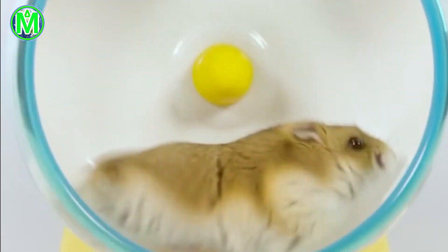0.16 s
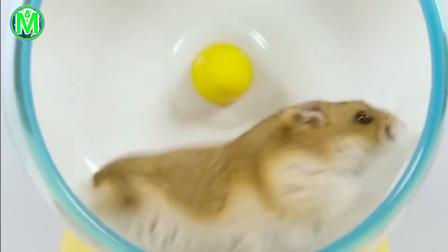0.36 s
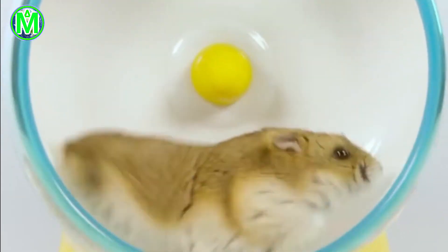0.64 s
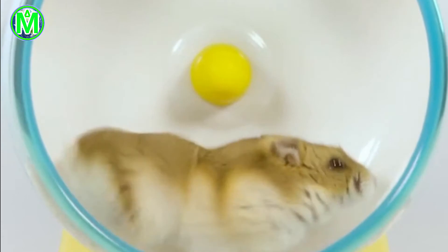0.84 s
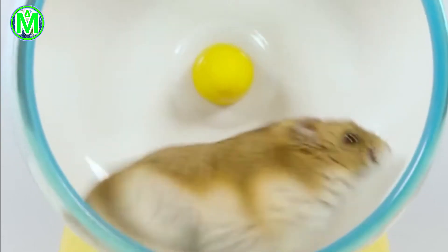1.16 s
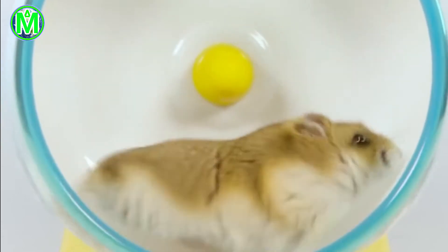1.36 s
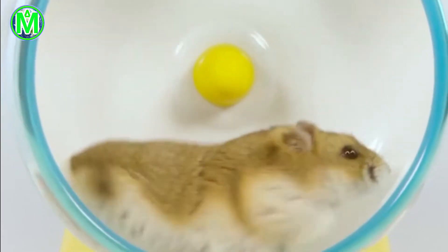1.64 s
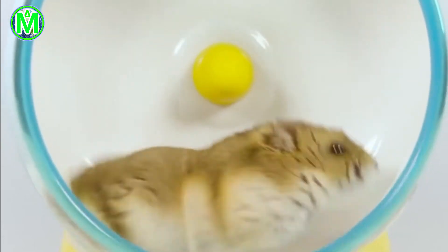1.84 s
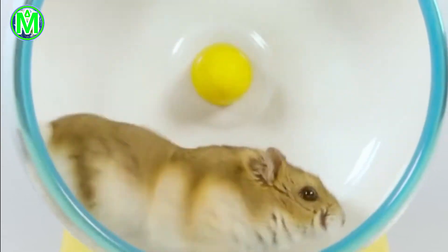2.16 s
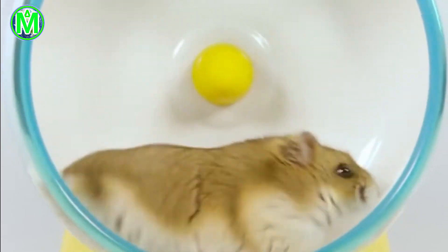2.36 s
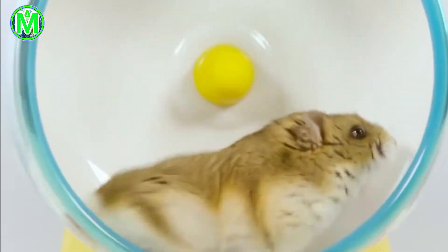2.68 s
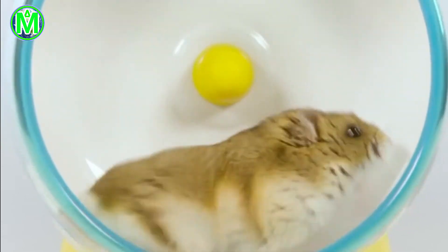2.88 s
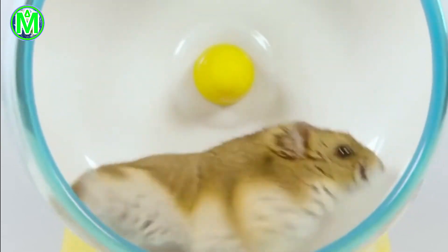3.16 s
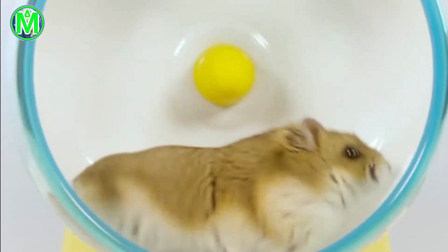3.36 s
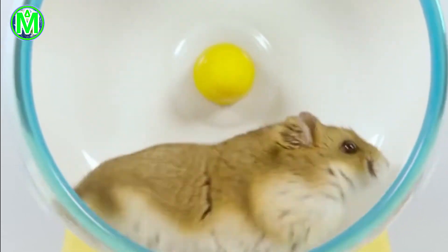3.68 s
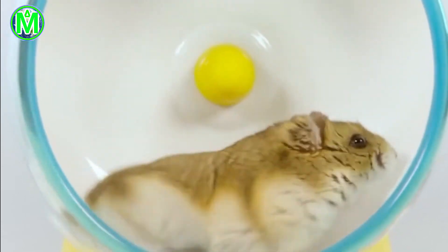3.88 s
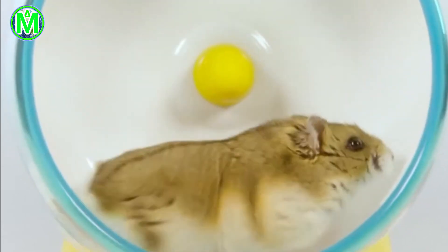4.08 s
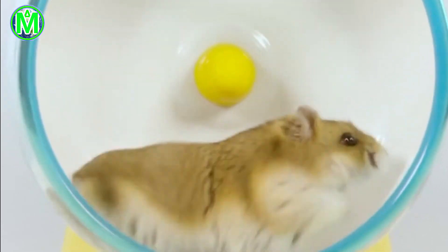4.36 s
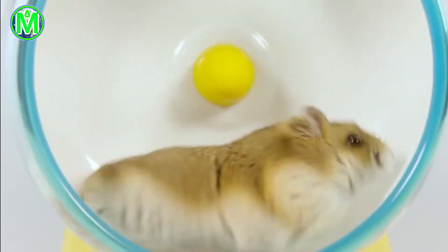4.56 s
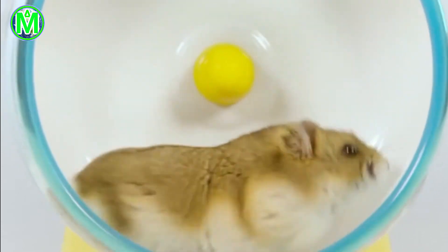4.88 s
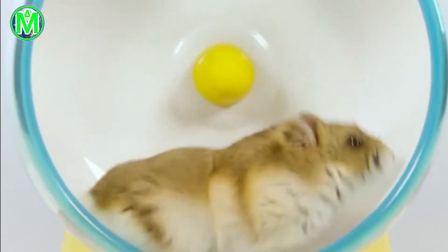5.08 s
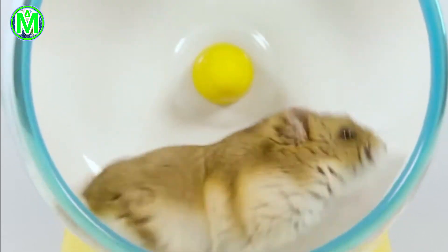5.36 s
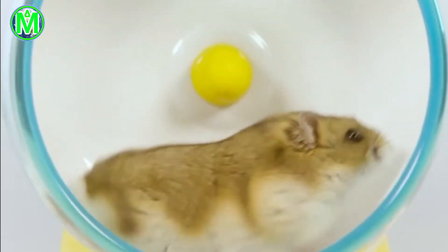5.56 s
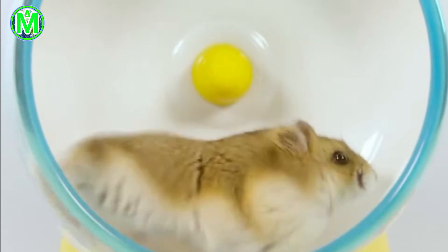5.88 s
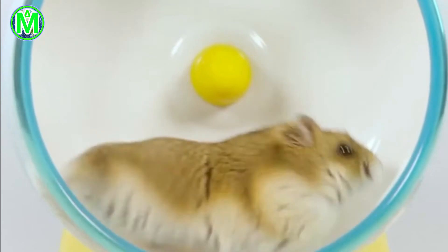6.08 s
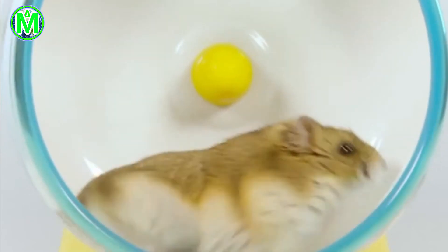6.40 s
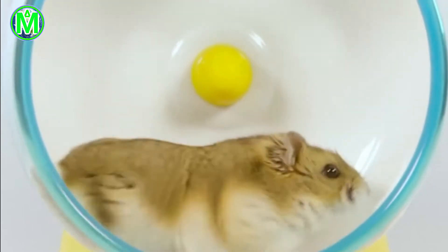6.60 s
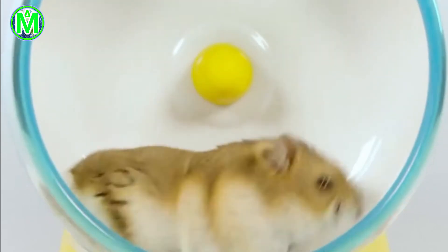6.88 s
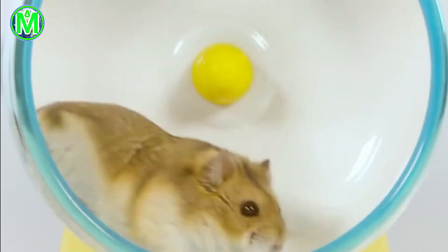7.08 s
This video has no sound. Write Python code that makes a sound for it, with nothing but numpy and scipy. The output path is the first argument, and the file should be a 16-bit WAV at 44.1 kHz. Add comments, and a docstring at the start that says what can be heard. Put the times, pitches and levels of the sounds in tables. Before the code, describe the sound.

A small hamster squeaks close to a stereo microphone in a small, bare, lightly echoing space. A tick and two quick piercing squeaks come at once, a longer wavering one at 0.2 seconds, then single squeaks near 0.4, 0.75 and 1.0. Each is a tiny high whistle, under a tenth of a second, some cracking into a rasp. From about 1 to 2.7 seconds there is only soft airy hiss and thin hum, dipping near 1.9 and swelling back, with barely audible ticks. A faint peep and thinner squeak at 2.8 lead to a crisp paw scuff at 2.9. Rapid squeaks return at 3.15, 3.35 and 3.45, a raspy pair at 3.7, then 3.95, a loud one at 4.2, 4.7, 5.05 and a last one at 5.3. Light scuffs appear among them, with a very faint chirp around 5.5. Quiet hiss continues to about 7 seconds.

```python
"""In a small bare room, a small rodent squeaks in bursts close to a stereo microphone. Each call is a whistle
mostly near 4-5 kHz with overtones; at times its period doubles or it breaks into a rasp of noise and split lines.
Short noise bursts, part ringing, part hissing, make paw scuffs, ticks and one faint narrow chirp near the end.
Behind them lie shaped stereo hiss, a thin hum and one faint far tone; the background drops in the first long
pause and swells back."""
import sys
import numpy as np
from scipy import signal
from scipy.fft import rfft, irfft, next_fast_len
from scipy.io import wavfile
from scipy.ndimage import uniform_filter1d, minimum_filter1d, map_coordinates

SR = 44100
rng = np.random.default_rng(int(sys.argv[2]) if len(sys.argv) > 2 else 0)


def store_wav(level_fs):
    """Save 16-bit WAV to argv[1]."""
    pcm = np.round(np.clip(np.atleast_2d(level_fs), -1, 1) * 32767)
    wavfile.write(sys.argv[1], SR, pcm.T.astype(np.int16))


N = 319284

# Background contour before a common lift: (time [s], level [dB])
AIR_CONTOUR = [(0, -56), (.3, -64), (1.2, -63), (1.94, -68.5), (1.945, -73), (2.8, -62.5), (4.3, -61.5),
               (5.5, -63.5), (7.24, -64)]
# Colour of the background hiss: (frequency [Hz], relative level [dB])
HISS_COLOUR = [(24, -70), (40, -39.5), (156, -39.5), (332, -22.5), (563, -9), (802, -4.5), (865, -2),
               (1060, -3.5), (1140, -4.5), (2490, -8), (14900, -13.5), (16500, -28)]
# Left-right likeness of the hiss: (frequency [Hz], correlation [-1 to 1])
HISS_LIKENESS = [(60, 0.01), (240, 0.06), (950, 0.37), (3770, -0.25), (15000, 0.12)]
HUM_HZ, HUM_DB = 1140, -15  # the hum's mean peak level, relative to the background contour
# Faint far tone: (time [s], pitch [Hz], rms level [dB])
FAR_TONE = [(4.63, 745, -79), (4.69, 748, -55), (4.74, 767, -55), (4.79, 742, -66), (4.83, 734, -68)]
# Paw scuffs, ticks and one faint narrow chirp near the end, levels before the ports:
# (time [s], ring level [dB], ring pitch [Hz], ring width [Hz], hiss level [dB], rise [s], 60 dB decay [s])
SHORT_BURSTS = [(0.022, -31.5, 3280, 509.6, -47, .001, 0.034),
                (1.181, -46, 10840, 2536, -66.5, 0.0053, 0.04), (2.533, -57.5, 2502, 600, -82, 0.0011, .02),
                (2.714, -67, 4970, 1500, -63, .001, .015), (2.8753, -36.5, 2520, 1583, -41, .002, 0.095),
                (2.894, -28, 2440, 1502, -41, 0.0025, .03), (2.899, -26, 3312, 2417, -26.5, .004, 0.033),
                (2.902, -44, 3000, 3027, -49, 0.0052, 0.18), (3.041, -56, 3980, 1500, -78, .001, 0.026),
                (3.627, -50.5, 2590, 1505, -50.5, 0.0022, 0.24),
                (4.157, -41.5, 2740, 1186, -41, 0.004996, 0.076),
                (5.253, -54.5, 4470, 2000, -59.5, .001, .02), (5.38, -56, 2633, 810, -45.5, .008, 0.072),
                (5.515, -66.5, 4196, 150, -83.5, 0.0066, 0.22)]
# Colour shared by raspy voice and burst hiss: (frequency [Hz], level [dB])
RASP_COLOUR = [(700, -56), (1300, -25), (1700, -9), (2300, -8), (3300, -10.5), (4600, -2), (6500, -2.5),
               (8000, -4.5), (11000, 4.5), (13000, -8), (14200, -20), (16000, -22.5)]
# Phase by which the left port leads, for a source one unit aside: (frequency [Hz], lead [rad])
PORT_LEAD = [(2400, 0), (4500, .7), (7000, 1.25), (9500, 1.7), (11700, 4.4), (14000, 8)]
# Whistle contours, one table per squeak: (time [s], pitch [Hz], level [dB])
SQUEAK_CONTOURS = [
    [(0.0555, 4490, -17.5), (0.0584, 4423, -13.5), (0.0609, 4816, -19.5), (0.0627, 4794, -18.0),
     (0.068, 4460, -24), (0.073, 4597, -32.0)],
    [(0.0755, 4491, -16.5), (0.0802, 4396, -11), (0.0822, 4550, -13.0), (0.0839, 4730, -19),
     (0.0862, 4744, -21.0), (0.0996, 4423, -10.5), (0.106, 4244, -21.5)],
    [(0.166, 5306, -15), (0.1737, 4646, -13.5), (0.1837, 5080, -16.5), (0.1899, 4940, -12),
     (0.1921, 4510, -13.5), (0.1959, 4340, -10.0), (0.2016, 4446, -9.5), (0.208, 4230, -16),
     (0.2206, 4176, -18.5), (0.2271, 4480, -23), (0.24, 4393, -15.5), (0.2445, 4624, -20.5),
     (0.257, 4390, -33)],
    [(0.399, 4608, -24), (0.4014, 4610, -21.5), (0.4037, 4774, -28.5), (0.4151, 5005, -20.5),
     (0.4215, 4860, -22.5), (0.4309, 4842, -20), (0.4446, 4876, -18), (0.4483, 4760, -24),
     (0.4573, 4730, -22.0), (0.462, 4638, -29)],
    [(0.72, 4544, -19.5), (0.7354, 4732, -22.5), (0.7454, 4420, -12.5), (0.7563, 4327, -16),
     (0.7621, 4424, -13.5), (0.7648, 4301, -19.5), (0.7671, 4480, -16.0), (0.7788, 4526, -17),
     (0.783, 4738, -24.5), (0.795, 4547, -27.5)],
    [(0.9535, 4912, -22.5), (0.9634, 4482, -14.5), (0.9669, 4404, -11), (0.9704, 4500, -12),
     (0.9764, 4700, -22), (0.9831, 4506, -14), (0.9921, 4702, -20), (0.9978, 4550, -14),
     (1.0036, 4373, -15.5), (1.008, 4400, -30)],
    [(2.726, 5020, -61.5), (2.7307, 5000, -52), (2.738, 4850, -62.5)],
    [(2.802, 5790, -29.5), (2.8047, 5700, -27), (2.8079, 5440, -32), (2.8222, 5765, -26),
     (2.8319, 5740, -26.5), (2.836, 5650, -29.5)],
    [(3.154, 4080, -29), (3.157, 4125, -21.5), (3.162, 4503, -18), (3.169, 4875, -19), (3.1814, 5319, -16),
     (3.1936, 4940, -18.0), (3.2026, 5052, -17.5), (3.2061, 5283, -21), (3.2158, 5000, -18.5),
     (3.2325, 4990, -17.5), (3.243, 4817, -21.5), (3.248, 4365, -22), (3.253, 4230, -28)],
    [(3.354, 4950, -17.5), (3.3624, 4917, -14.5), (3.3697, 5133, -18), (3.3799, 4772, -13.5),
     (3.3816, 5087, -17.5), (3.3829, 4805, -17.5), (3.3904, 4545, -18.5), (3.394, 4400, -21)],
    [(3.426, 4600, -30.0), (3.4354, 4850, -21), (3.4412, 4443, -16), (3.4466, 4762, -23.5),
     (3.4566, 4890, -19), (3.4646, 4684, -13), (3.4691, 4605, -20.0), (3.4753, 4390, -12.5),
     (3.479, 4239, -20)],
    [(3.655, 4457, -18.0), (3.6589, 4490, -14.5), (3.6682, 4585, -21.0), (3.6881, 4188, -16),
     (3.6911, 4471, -20.0), (3.6976, 4162, -21.0), (3.7003, 4302, -13.5), (3.7046, 4422, -15),
     (3.7068, 4310, -13), (3.7198, 4025, -23.5), (3.73, 3900, -30)],
    [(3.731, 4220, -21.5), (3.7342, 4217, -15), (3.7377, 4450, -13), (3.7414, 4482, -16),
     (3.747, 4470, -26)],
    [(3.94, 4468, -23), (3.9454, 4510, -14), (3.9499, 4225, -19.5), (3.9549, 4263, -14.5),
     (3.9726, 4203, -14.5), (3.9786, 4014, -23.0), (3.9818, 4250, -13), (3.986, 4320, -24.5)],
    [(4.188, 5012, -22), (4.1924, 4693, -16.5), (4.2012, 4361, -12.0), (4.2109, 4244, -14),
     (4.2196, 4484, -8.5), (4.2266, 4753, -20), (4.2328, 4433, -13.5), (4.237, 4233, -25.5)],
    [(4.718, 4448, -24.5), (4.7229, 4520, -16), (4.7282, 4333, -12.5), (4.7332, 4499, -10.5),
     (4.7391, 4782, -21), (4.7519, 4567, -15), (4.757, 4500, -19)],
    [(5.048, 4818, -18), (5.0562, 5007, -13.5), (5.0699, 5262, -20), (5.0734, 5225, -16),
     (5.0786, 5036, -19.5), (5.0824, 5022, -15), (5.0891, 4980, -18.5), (5.095, 4869, -23.5)],
    [(5.2695, 5190, -25), (5.2732, 5238, -17.5), (5.2779, 5390, -15), (5.3158, 5243, -13.5),
     (5.332, 5110, -20.5), (5.342, 5057, -14.5), (5.345, 4877, -16.5), (5.3468, 4730, -22),
     (5.35, 4467, -27), (5.355, 4340, -28.5)],
]
# One row per squeak: (2nd overtone against whistle [dB], 3rd overtone against whistle [dB],
# fade of both over the call [dB], steady rasp [dB], left-right [dB], offset to the left [units of PORT_LEAD])
CALL_CHARACTER = [(-15, -31, 11, -45, 2.6, 0.95), (-6.5, -30, 0.5, -43, 3, 2),
                  (-5, -27, 16.5, -34.5, 6.6, 1.09), (-8.5, -28, 2, -59, 9.5, 0.94),
                  (0.5, -19, 13, -36.5, 5.5, 1.59), (-5, -23, 9.5, -35.5, 5.8, 2),
                  (-10, -28, .1, -65, 7, 2.2), (-5, -30, -3, -47.5, 7, 0.45),
                  (-12, -33, 1, -34.5, 1.5, 0.95), (-7, -29.5, 13, -29, 1.8, 0.98),
                  (-8.5, -30, -4, -43.5, 2.6, 1.5), (-6, -23, -3, -24, 2.3, 1.31),
                  (-11, -33.5, 3, -32.5, 2.6, 1.14), (-7.5, -26, -2.5, -51.5, 2.6, 1.5),
                  (-4, -23, 2.5, -39.5, 2.7, 1.45), (-8, -25, 4.5, -44, 3.9, 1.3),
                  (-13, -30, 1.5, -57.5, 1.8, 0.5), (-11.5, -32, 2.5, -60.5, 1.2, 0.49)]
# Cycles after which a rasping call repeats its pattern, one entry per squeak: count [cycles]
RASP_CYCLES = [4, 4, 3, 4, 4, 4, 3, 4, 3, 4, 3, 3, 3, 3, 4, 4, 3, 3]
# The path from mouth to microphone favours some pitches:
# (whistle pitch [Hz], 2nd overtone [dB], 3rd overtone [dB], left-right [dB])
PATH_BY_PITCH = [(4003, -1, 15.5, -1.44), (4250, -1.5, 11, -3), (4400, -3, 5, -1.3),
                 (4550, -5.5, 3.5, -0.4), (4700, 3, 6, -0.76), (4852, 0.9, 3.5, 1.5), (5000, 2, 2, 1),
                 (5100, -0.5, 7, 6), (5160, 7, -16, -2), (5260, -0.1, -37.5, -4.5)]
# Moments when the voice breaks into a rasp: (middle [s], half length [s], level [dB])
RASP_SPELLS = [(.058, .005, -28), (.082, .008, -37), (.176, .006, -27.5), (.198, .008, -29),
               (.228, .012, -25), (.4, .008, -46), (.72, .004, -22), (.768, .012, -18.5),
               (.983, .008, -27.5), (2.814, .008, -32), (3.158, .011, -17), (3.184, .014, -17),
               (3.24, 0.0089, -32.5), (3.379, .011, -13), (3.436, .011, -40.5), (3.479, 0.0036, -35),
               (3.669, .008, -15), (3.689, 0.013, -15), (3.73, 0.0061, -20), (3.94, 0.0055, -43.5),
               (4.204, .011, -36), (4.728, .009, -28.5), (5.052, .011, -47.5), (5.345, .012, -51)]
# Moments when the period doubles: (middle [s], half length [s], half-pitch level [dB], halfway lines [dB])
DOUBLING_SPELLS = [(.059, .003, -56, -33), (.079, .003, -58.5, -31.5), (.097, .004, -63, -47),
                   (.173, 0.0039, -24.5, -18), (.232, .014, -41.5, -36), (.433, 0.016, -36, -29.5),
                   (.72, .003, -37, -23), (.748, .004, -42.5, -29.5), (.772, .013, -42, -31.5),
                   (.961, .006, -37.5, -25.5), (.976, 0.012, -42, -24), (2.813, .006, -62, -40),
                   (3.171, .006, -32, -24), (3.193, 0.01, -44.5, -37.5), (3.24, .006, -52.5, -38),
                   (3.364, .009, -29.5, -18), (3.381, .008, -28, -22), (3.44, .011, -55.5, -52),
                   (3.669, .004, -35, -29.5), (3.688, 0.006, -31, -26), (3.735, .003, -47, -39),
                   (4.194, .004, -34, -25), (4.222, .007, -42.5, -29.5), (4.73, .004, -49.5, -32)]
# Upper lines of the doubled period: (multiple of the pitch, level against the halfway lines [dB])
HALFWAY_LINES = [(1.5, -1), (2.5, -4), (3.5, -14.5)]
# Decay of the room: (frequency [Hz], 60 dB decay [s])
ROOM_DECAY = [(1500, .52), (2400, .3), (5000, 0.18), (9000, 0.19), (14000, 0.17)]
TOP_HZ = 16300


def amp(db):
    """Gain of a level in dB."""
    return 10 ** (np.asarray(db) / 20)


def unit(x):
    """x at rms 1."""
    return x / np.sqrt(np.mean(x ** 2) + 1e-20)


def along(points, hz):
    """(frequency, value) points read on a log axis."""
    f, v = np.transpose(points)
    return np.interp(np.log(hz + 1), np.log(f + 1), v)


def curves(rows, at):
    """Each column after the first, read along the first."""
    x, *cols = np.transpose(rows)
    return [np.interp(at, x, c) for c in cols]


def wobble(rate):
    """A smooth random curve, rate knots a second."""
    knots = rng.standard_normal(int(N * rate / SR) + 4)
    return map_coordinates(knots, [np.arange(N) * rate / SR])


def filtered(x, response):
    """x times a response of frequency, padded so that little wraps round."""
    n = x.shape[-1]
    m = next_fast_len(n + 8192)
    return irfft(rfft(x, m) * response(np.fft.rfftfreq(m, 1 / SR)), m)[..., :n]


def spells(rows, t, order):
    """The level in dB of each column, swelling and fading about its moments; a higher order holds flatter."""
    middle, half, *cols = np.transpose(rows)
    bumps = np.exp(-np.abs((t[:, None] - middle) / half) ** order)
    return [20 * np.log10(bumps @ amp(c) + 1e-6) for c in cols]


def background():
    """Stereo hiss with slow patches, a thin wavering hum and one faint far tone."""
    t = np.arange(N) / SR
    # smoothed over neighbouring bands and moments, random levels become patches
    z = signal.stft(rng.standard_normal((2, N)), nperseg=512)[2]
    patches = uniform_filter1d(rng.standard_normal(z.shape[1:]), 4, 0)
    patches = unit(uniform_filter1d(patches, 10, 1))
    pair = signal.istft(z * amp(patches), nperseg=512)[1][:, :N]

    def mid_side(hz):
        # this angle between mid and side gives the wanted left-right correlation
        turn = np.arccos(np.clip(along(HISS_LIKENESS, hz), -1, 1)) / 2
        return amp(along(HISS_COLOUR, hz)) * [np.cos(turn), np.sin(turn)]

    mid, side = filtered(pair, mid_side)
    hiss = unit(np.array([mid + side, mid - side])) * amp([[.3], [-.3]])
    hum_phase = 2 * np.pi * HUM_HZ * t + .4 * wobble(8)
    hum = amp(HUM_DB + 2.5 * wobble(11)) * np.sin(hum_phase)
    tone_hz, tone_db = curves(FAR_TONE, t)
    sounding = (t > FAR_TONE[0][0]) * (t < FAR_TONE[-1][0])
    tone = amp(tone_db) * sounding * np.sin(2 * np.pi * np.cumsum(tone_hz) / SR)
    lift_db = 2.5
    return amp(curves(AIR_CONTOUR, t)[0] + lift_db) * (hiss + hum) + np.sqrt(2) * tone


def at_ports(x, pan_db=0, aside=0.2):
    """The two ports hear a near source unequally loud and, in the treble, out of phase."""
    def tilt(hz):
        louder = amp(along([(2400, 0.17), (4500, 0.42), (12000, 0.67)], hz))
        return louder * np.exp(.5j * aside * along(PORT_LEAD, hz))

    return filtered(x, lambda hz: [amp(pan_db / 2) * tilt(hz), amp(-pan_db / 2) / tilt(hz)])


def short_bursts():
    """Grainy noise, ringing and hissing: scuffs and ticks of paws on the floor, and a faint narrow chirp."""
    out, t = np.zeros(N), np.arange(SR // 8) / SR
    for start, ring_db, hz, width_hz, hiss_db, rise, decay in SHORT_BURSTS:
        # fast random swings in level, 4 dB deep, make the grain
        swings = uniform_filter1d(rng.standard_normal((2, len(t))), size=10) * np.sqrt(10)
        grains = rng.standard_normal((2, len(t))) * amp(4 * swings)

        def resonance(f):
            damping = 1j * f * width_hz
            return (damping / (hz * hz - f * f + damping)) ** 2

        ring = filtered(grains[0], resonance)
        hiss = filtered(grains[1], lambda f: amp(along(RASP_COLOUR, f)))
        shape = np.clip(t / rise, 0, 1) ** 2 * amp(-60 * np.clip(t - rise, 0, 1) / decay)
        burst = shape * (amp(ring_db) * unit(ring) + amp(hiss_db) * unit(hiss))
        out[round(start * SR):][:len(t)] += burst
    return at_ports(out, pan_db=4.0)


def squeaks():
    """Each call is a whistle with overtones and halfway lines; a rasp fills it with broken bands and breath noise."""
    out = np.zeros((2, N))
    breath, jitter = rng.standard_normal(N), wobble(500)
    shimmer = np.array([wobble(250) for _ in range(7)])
    flicker = np.array([wobble(210) + 1j * wobble(210) for _ in range(14)])
    for rows, count, character in zip(SQUEAK_CONTOURS, RASP_CYCLES, CALL_CHARACTER):
        second, third, fade_db, steady_db, left_db, aside = character
        start, end = rows[0][0], rows[-1][0]
        i = np.arange(round(start * SR) - 300, round(end * SR) + 300)
        t = i / SR
        hz, whistle_db = curves(rows, t)
        path_second, path_third, path_pan = curves(PATH_BY_PITCH, hz)
        upper_db = whistle_db - fade_db * ((t - start) / (end - start) - .5)
        second_db = upper_db + second + path_second
        third_db = upper_db + third + path_third
        pan_db = left_db + path_pan
        half_db, halfway_db = spells(DOUBLING_SPELLS, t, order=4)
        rasp_db = 20 * np.log10(amp(spells(RASP_SPELLS, t, order=2)[0]) + amp(steady_db))

        # a raspy throat also shakes pitch and size
        rough = np.clip(amp(rasp_db - whistle_db), 0, 1)
        shaken_hz = hz * (1 + (0.004 + 0.012 * rough) * jitter[i])
        phase = 2 * np.pi * np.cumsum(shaken_hz) / SR
        lines = [(.5, half_db), (1, whistle_db), (2, second_db), (3, third_db)]
        lines += [(k, halfway_db + db) for k, db in HALFWAY_LINES]
        voice = 0
        for (k, db), shake in zip(lines, shimmer):
            # the higher a line, the more its size trembles
            tremble_db = (1.11 + 1.2 * rough) * k * shake[i]
            voice = voice + np.sqrt(2) * amp(db + tremble_db) * np.sin(k * phase)

        # lines between the overtones that come and go at random
        bands = sum(np.real(flicker[k, i] * np.exp(1j * k * phase / count))
                    for k in range(1, 14) if k % count)
        # the throat opens and shuts fast
        edges = np.clip((t - start) / 0.0011, 0, 1) * np.clip((end - t) / 0.0017, 0, 1)
        place = np.sin(np.pi / 2 * edges) ** 2 * amp([pan_db / 2, -pan_db / 2])
        rasp = amp(rasp_db) * (.22 * bands + .7 * breath[i]) * place
        rasp = filtered(rasp, lambda f: amp(along(RASP_COLOUR, f) - 1.0))
        out[:, i] += at_ports(voice * place + rasp, aside=aside)
    return out


def room(x):
    """The walls answer after 2.8 ms with a dense noise tail; its main part decays at a speed set by frequency."""
    hz, t, z = signal.stft(rng.standard_normal((3, SR // 2)), SR, nperseg=256)
    decay = amp(-60 * t / along(ROOM_DECAY, hz)[:, None])
    decay = decay + amp(-60 * t / 0.29)  # a second part, alike at all frequencies
    # the walls return more of the treble
    wall_db = along([(1800, -0.36), (2400, -1), (4500, -0.95), (9000, -0.03), (13000, 0.27)], hz)
    decay = decay * amp(wall_db)[:, None]
    common, left, right = signal.istft(z * decay, SR, nperseg=256)[1]
    tail = np.array([left, right]) + 4.7 * common
    tail = np.pad(tail / np.linalg.norm(tail[0]), ((0, 0), (round(0.0028 * SR), 0)))
    return signal.fftconvolve(x, tail, axes=1)[:, :N]


def scene():
    """Near sounds, room and background; four room tails take turns, a third of a second each, so the echoes vary."""
    near = squeaks() + short_bursts()
    turns = np.arange(N) * 3 // SR % 4 == np.arange(4)[:, None]
    shares = uniform_filter1d(turns, size=2000, output=float)
    walls = amp(-13.5) * sum(room(near * share) for share in shares)
    return near + walls + background()


def record(dry):
    """A slightly uneven capsule adds a faint low bump under loud calls; a fast limiter; the band limit."""
    heard = dry + amp(-56.0) * dry ** 2
    needed = .95 / np.maximum(np.abs(heard).max(axis=0), .95)
    gain = uniform_filter1d(minimum_filter1d(needed, size=161), size=81)
    return filtered(heard * gain, lambda hz: hz < TOP_HZ)


dry = scene()
out = record(dry)
store_wav(out)
```